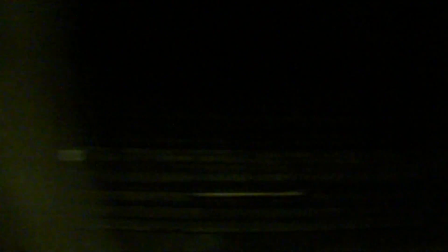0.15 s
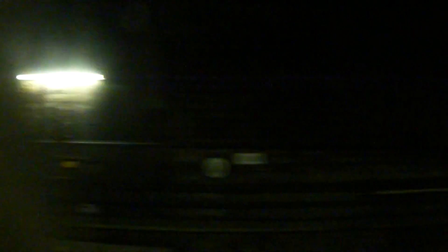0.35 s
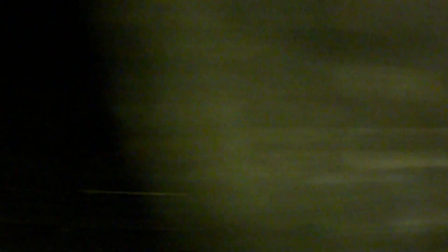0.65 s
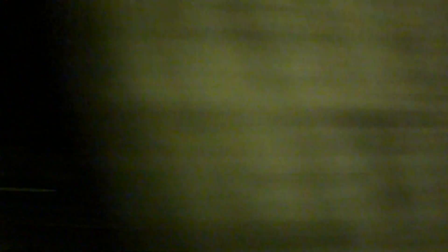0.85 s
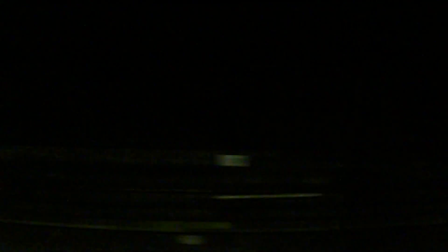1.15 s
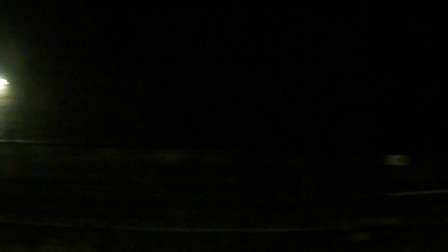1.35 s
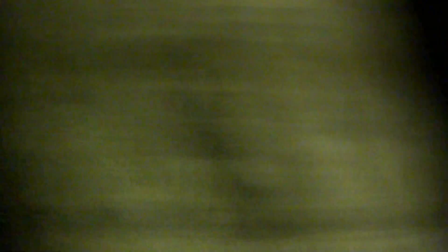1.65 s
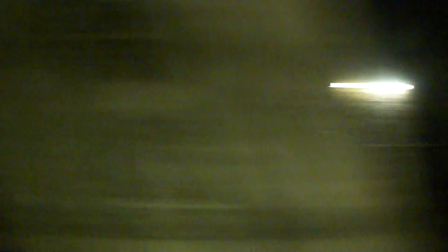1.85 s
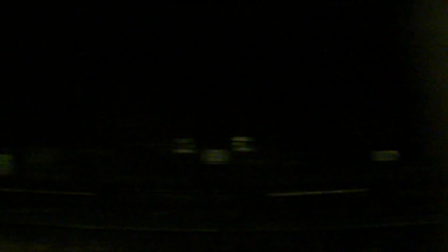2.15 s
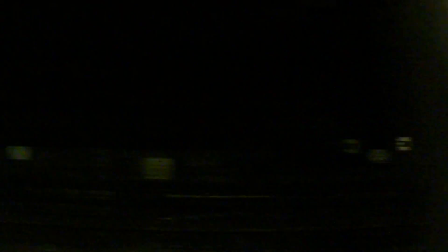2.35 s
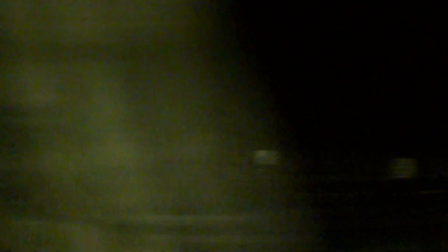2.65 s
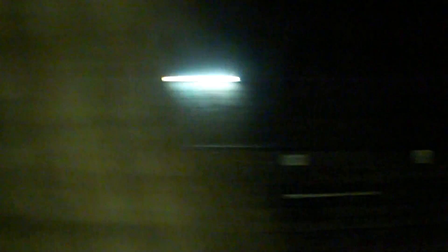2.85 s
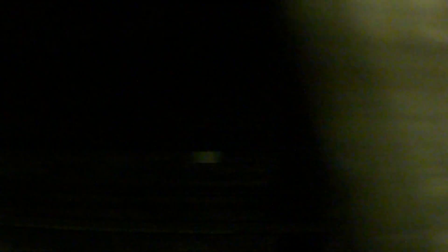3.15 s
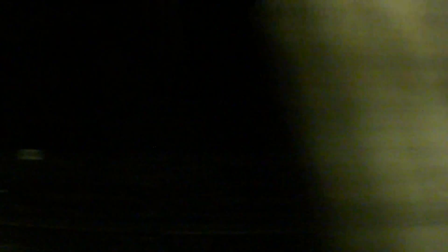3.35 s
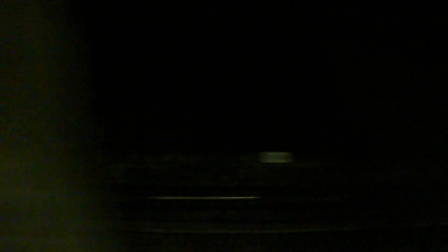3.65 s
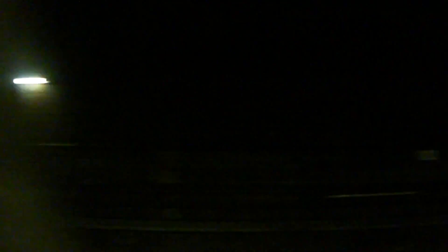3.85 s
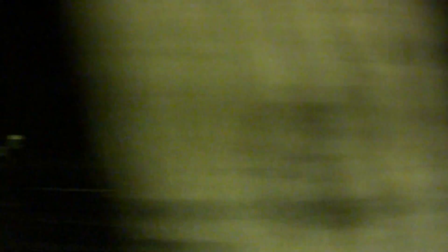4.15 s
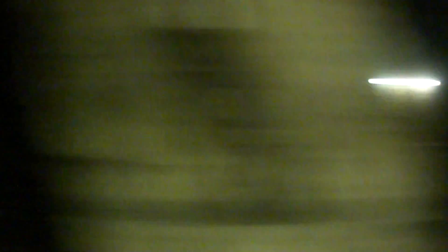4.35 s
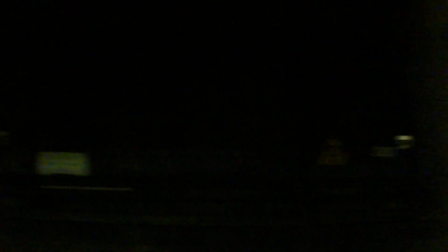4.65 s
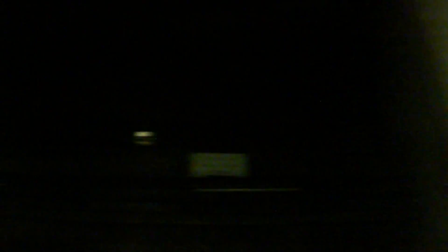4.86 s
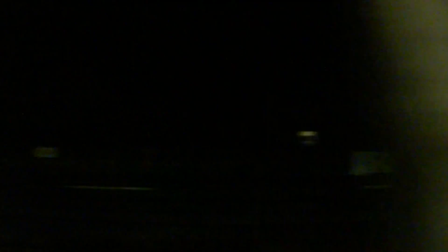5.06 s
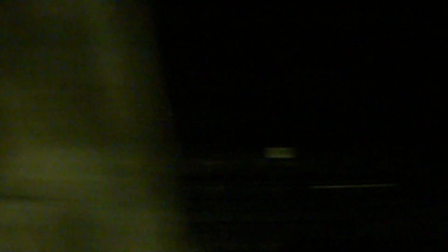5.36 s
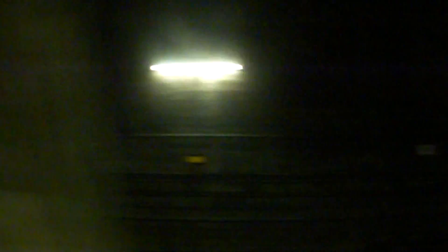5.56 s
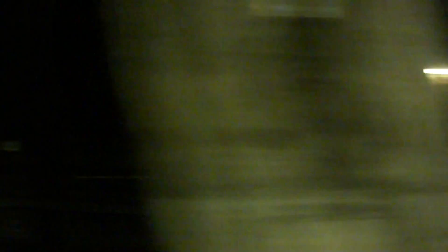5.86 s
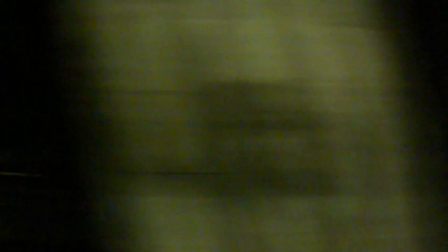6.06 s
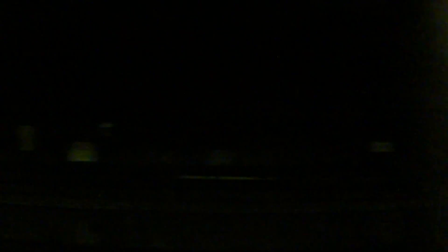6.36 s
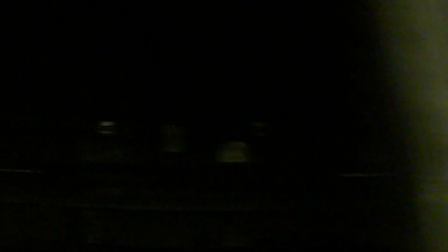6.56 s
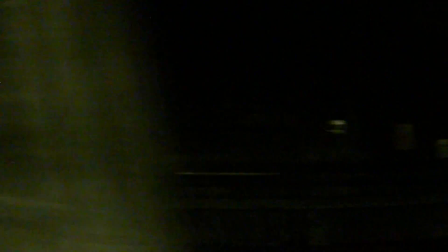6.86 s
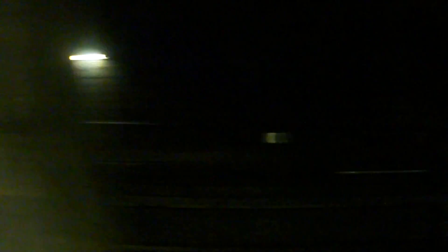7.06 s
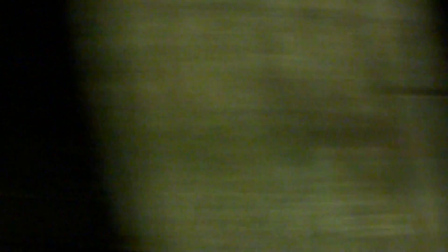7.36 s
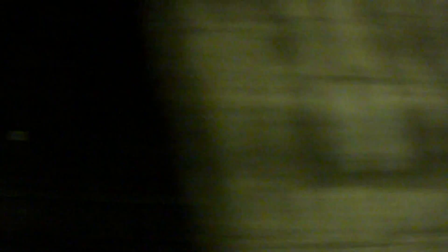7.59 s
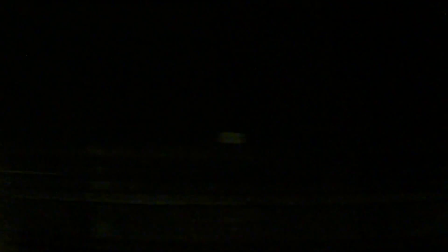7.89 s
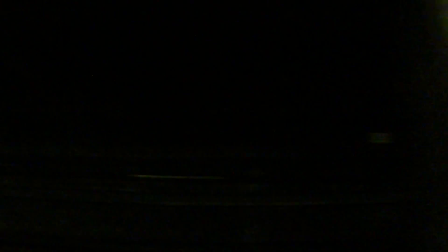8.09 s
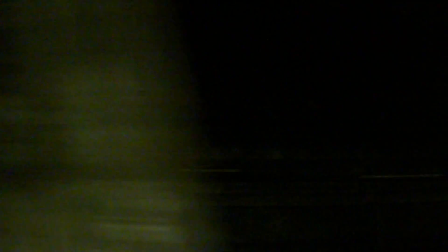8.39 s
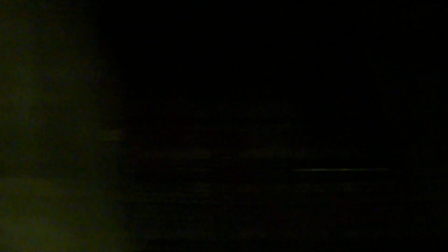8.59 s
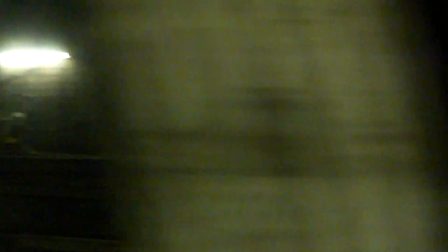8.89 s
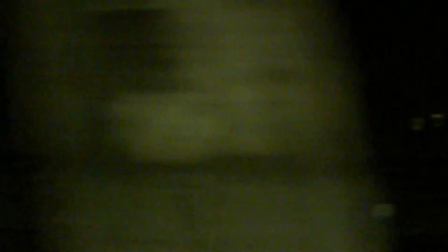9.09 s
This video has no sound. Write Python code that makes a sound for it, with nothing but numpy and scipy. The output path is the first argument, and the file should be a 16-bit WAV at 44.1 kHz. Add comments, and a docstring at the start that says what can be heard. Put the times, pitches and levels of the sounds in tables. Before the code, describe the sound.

Loud rolling rumble and a steady low drone fill a subway car moving through a tunnel, picked up from inside by a pocket camera. The floor and walls resonate, and the track noise swells in short surges. From about halfway the roar brightens, the rails sing faintly and a loose fitting ticks lightly now and then. A few soft knocks from rail joints come in the last second.

```python
"""A subway car running through a tunnel, heard from inside: the body hums, floor and panels boom.
Underfoot the wheels roar, brighter as the run goes on, and knock on rail joints; the rails sing.
Around the microphones air hisses at the door seals and a small loose fitting ticks.
The pocket camera's stereo pair thins the bass, dulls and notches the treble, rides the gain
and crackles faintly now and then."""
import sys
import numpy as np
from scipy import signal
from scipy.fft import rfft, irfft, next_fast_len
from scipy.io import wavfile
from scipy.ndimage import uniform_filter1d

SR = 44100
rng = np.random.default_rng(int(sys.argv[2]) if len(sys.argv) > 2 else 0)


def store_pcm(level_fs):
    """Save levels as 16-bit WAV."""
    pcm = np.round(np.clip(level_fs, -1, 1) * 32767).astype(np.int16)
    wavfile.write(sys.argv[1], SR, np.atleast_2d(pcm).T)


N = 407043
TIME = np.arange(N) / SR
SIZE = next_fast_len(N)
HZ = np.fft.rfftfreq(SIZE, 1 / SR)

# Resonances of the car: f/Hz, nominal width/Hz, level/dB
BODY_MODE = [(187, 39.6, 0)]  # first bending mode
FLOOR_MODES = [(304.8, 91, 3.5), (353.6, 60, 0)]
DRONE_MODES = [(75, 30, 3), (111, 40, -6)]
# Slow course of the low drone: t/s, level/dB
DRONE_LEVEL = [(0, -59.5), (1, -63), (2.5, -66), (3.5, -60), (5, -61), (6.5, -60), (7.1, -46), (8, -57),
               (8.8, -45), (9.23, -41)]
# Spectrum of the deep shudder: f/Hz, level/dB
SHUDDER_SPECTRUM = [(15, -80.5), (25, -55), (43, -52), (68, -40.5), (127, -8.5), (146, 4), (170, 5),
                    (220, -32.5), (370, -120)]
# Slow levels in the car: t/s, body hum/dB, floor boom/dB, rolling rumble/dB, shudder/dB
BODY_LEVELS = [(0, -22, -39, -22, -43), (0.401, -24, -33.5, -23.5, -58), (.9, -20, -31, -25, -56),
               (1.398, -19.5, -34.5, -23.5, -55), (1.899, -22.5, -31.5, -23, -47.5),
               (2.6, -20.5, -31, -21.5, -52.5), (3.3, -23, -31, -24, -43), (3.8, -24.5, -29, -20, -34),
               (4.4, -23.5, -28.5, -20.5, -42), (4.8, -24, -26, -21.5, -31),
               (5.599, -25, -21, -24.5, -36.5), (6.3, -27.5, -20.5, -22, -34.5),
               (7.0, -23, -24, -21.5, -35), (7.6, -25.5, -20, -22.5, -34), (8.3, -33, -19.5, -26.5, -34),
               (8.6, -24.5, -22, -26.5, -31), (8.9, -32.5, -28, -28.5, -32.5),
               (9.23, -27.5, -19.5, -36, -32)]


def car_body():
    """All around the microphones the body hums, booms and shudders, shaken by the running gear."""
    s, hum_db, boom_db, _, shudder_db = np.transpose(BODY_LEVELS)
    hum = steadied(noise(peaks(BODY_MODE, steep=3.25), s, 0 * s), share=.33)
    hum = hum * gain_of(np.interp(TIME, s, hum_db) + 0.2 * wander(per_s=10))
    hum = drifted(hum, shift_hz=1.78 * wander(per_s=2.5))
    low_cut = 1 / (1 + (155 / (HZ + 1)) ** 14)  # little of the hum reaches below about 155 Hz
    hum = filtered(hum, low_cut)
    boom = noise(peaks(FLOOR_MODES, steep=1.78), s, boom_db) * gain_of(0.47 * wander(per_s=3.7))
    drone = noise(peaks(DRONE_MODES, steep=1.7), *np.transpose(DRONE_LEVEL))
    shudder = noise(colour(SHUDDER_SPECTRUM), s, shudder_db) * gain_of(2.4 * wander(per_s=5))
    return hum + boom + drone + shudder


# Spectra of the rolling wheels, from inside the car: f/Hz, level/dB
RUMBLE_SPECTRUM = [(200, -56), (340, -1), (400, 2), (470, -3.5), (540, -4.5), (630, -7.5), (720, -11),
                   (816, -14), (1000, -26.5), (1300, -50.5), (2200, -120)]
DULL_ROAR = [(500, -24.5), (850, -2.5), (978, -1.5), (1140, 0.5), (1540, -3.5), (1890, -7), (2200, -9.5),
             (2700, -21), (2950, -26), (3840, -59), (6490, -120)]
BRIGHT_ROAR = [(500, -31.5), (850, -1), (1120, -9), (1200, -7), (1550, -5.5), (1830, -8.5), (2170, -8.5),
               (2660, -13), (2950, -18.5), (3840, -56), (6490, -120)]  # with the flanges rubbing
# Bright part of the roar's power: t/s, share/0-1
BRIGHTNESS = [(0, 0), (2, 0.18), (3.5, 0.26), (5, 0.65), (6.5, 0.92), (8, 0.89), (9.23, 0.7)]
# Wheel resonances: f/Hz, nominal width/Hz, level/dB
WHEEL_MODES = [(1560, 210, 2.5), (2145, 240, 2.5)]
# Slow levels of the track noise: t/s, wheel roar/dB, door hiss/dB
TRACK_LEVELS = [(0, -32.5, -61.5), (.3, -33.5, -61), (.8, -36, -63), (1.5, -35.5, -62.5),
                (1.95, -34.5, -61.5), (2.5, -36, -62), (3.3, -35, -61.5), (3.9, -33, -61),
                (4.3, -33.5, -62), (4.7, -31.5, -59.5), (5.2, -32.5, -59), (5.65, -32.5, -61),
                (6.0, -32.5, -57), (6.45, -32.5, -59.5), (6.9, -31, -56.5), (7.8, -29.5, -57),
                (8.3, -30, -56), (8.6, -28.5, -56), (9.0, -26.5, -53), (9.23, -34, -58)]
# The whole track noise surges: t/s, length/s, rumble gain/dB, roar gain/dB, nominal hiss gain/dB
SURGES = [(1.0, .05, 1, 0.5, 4), (1.01, .12, 1.5, 3.5, 3.5), (1.3, 0.15, 1.5, 1.5, 2.5),
          (2.0, 0.16, 1, 2, 2.5), (2.52, 0.14, 1, 2.5, 2), (2.86, 0.11, 1, 4, 2.5),
          (3.5, 0.11, -0.5, 0.5, 1.5), (3.63, 0.076, 1, 1, 2), (4.46, 0.036, 0.5, 2, 2.5),
          (4.73, 0.086, 0, -1.5, -1), (5.26, .06, 0.5, 1.5, 0), (6.02, 0.2, 1, 1, 1),
          (8.42, .08, 2.5, 2, 3.5), (8.55, 0.04, 2, 3, 3), (8.675, 0.066, 1, 2.5, 6),
          (8.76, 0.087, -0.5, 2.5, 9), (9.04, 0.026, 4, 5, 5), (9.12, 0.072, 0, 5, 8)]
# The flanges rub for a moment: t/s, length/s, wheel ring gain/dB, squeal gain/dB, singing gain/dB
FLANGE_RUBS = [(3.63, 0.041, 11, 3, 5), (4.35, .05, 6, 4, 6), (4.67, .13, 4, 2, 10),
               (5.26, 0.04, 12, -2, -1), (5.96, 0.11, 4, -3, 3.5), (6.7, 0.52, 3, -7, 3),
               (6.97, 0.026, 13, 0, -1), (7.19, .23, 3, 5, -1), (7.62, 0.12, 7, 6, 6), (7.9, .08, 2, 2, 6),
               (8.05, 0.45, -1, 6, 3), (8.56, 0.042, 13, -5, 5), (8.74, 0.11, 8.5, -6, 6),
               (9.04, 0.053, 12.5, -7, -5), (9.11, 0.14, 11.5, 0, 5.5)]


def wheels():
    """Rolling rumble and roar come back from the tunnel walls; the wheels ring on top."""
    s, _, _, rumble_db, _ = np.transpose(BODY_LEVELS)
    rumble = noise(colour(RUMBLE_SPECTRUM), s, rumble_db)
    rumble = rumble * gain_of(swell(SURGES, column=2) + 0.31 * wander(per_s=8.2))
    s, roar_db, _ = np.transpose(TRACK_LEVELS)
    dull = noise(colour(DULL_ROAR), s, roar_db)
    bright = noise(colour(BRIGHT_ROAR), s, roar_db)
    share = curve(BRIGHTNESS)
    roar = (np.sqrt(1 - share) * dull + np.sqrt(share) * bright) * gain_of(swell(SURGES, column=3))
    ring_db = follow_hiss(-46.5, slope=0.59) + swell(FLANGE_RUBS, column=2) + 3.7 * wander(per_s=7.6)
    rings = noise(peaks(WHEEL_MODES, steep=1.74), TIME, ring_db)
    return rumble + rings + roar * gain_of(0.5 * wander(per_s=20))


# Wall and roof panel resonances: f/Hz, nominal width/Hz
PANEL_MODES = [(214, 66.4), (435, 58), (500, 69), (582, 74), (672, 74), (760, 110)]
# Their slow levels: t/s, then level/dB for each mode in turn
PANEL_LEVELS = [(0, -23, -22, -41.5, -28, -35, -39), (0.599, -24.5, -24, -43, -36.5, -34.5, -40),
                (1, -27.5, -30.5, -41, -40.5, -37.5, -37.5), (1.4, -27.5, -28.5, -40, -40, -35, -39.5),
                (2, -24, -32.5, -40, -41, -40, -41), (2.7, -24.5, -28.5, -35.5, -33.5, -32.5, -41.5),
                (3.4, -25, -25.5, -37.5, -29.5, -35.5, -38.5), (4.1, -24, -27, -35.5, -34.5, -41, -44),
                (4.7, -26, -31, -31, -31, -39.5, -37), (5.3, -29, -23, -27.5, -31.5, -36, -40),
                (6.001, -28, -26, -31.5, -32.5, -39, -40), (6.7, -25.5, -28.5, -32, -28.5, -43, -40),
                (7.4, -29.5, -24, -33, -32.5, -35.5, -41.5), (8.1, -31, -23, -26, -28, -36, -41.5),
                (8.6, -27.5, -29, -28, -32.5, -35, -37.5), (8.9, -23.5, -27, -27.5, -31.5, -32.5, -31),
                (9.23, -33.5, -31.5, -23, -32, -32, -30)]
# All modes drift up or down together: t/s, shift/share of pitch
PANEL_DRIFT = [(0, 0.036), (1.4, 0.017), (2.5, -0.017), (3.2, -.03), (4.2, -0.0048), (6, 0.0092),
               (7.5, .025), (8.1, -0.008), (9.23, 0.0051)]


def panels():
    """Beside and above the microphones each panel mode rings and wavers; track surges shake them all."""
    s, *levels = np.transpose(PANEL_LEVELS)
    drift = curve(PANEL_DRIFT)
    out = np.zeros((2, N))
    for (hz, width), db in zip(PANEL_MODES, levels):
        ring = noise(peaks([(hz, width, 0)], steep=3.04), s, db)
        out += drifted(ring, shift_hz=hz * (drift + .015 * wander(per_s=1.5)))
    return out * gain_of(1.55 * swell(SURGES, column=2))


# Wheels cross rail joints: t/s, gain/dB, ring length/factor
RAIL_JOINTS = [(8.561, -8, 0.8), (9.02, -15, 0.84), (9.053, -10, 1.), (9.065, -25, 0.87), (9.084, -10, 1.)]
# Resonances of the running gear: f/Hz, level/dB, nominal t60/s
BOGIE_MODES = [(290, 4.5, 0.054), (345, -25, .05), (500, -7, 0.037), (584, -1, 0.05), (656, -1, 0.046),
               (800, -4, .04), (905, -11, .03), (1560, -19, .03), (2120, -5, .04)]


def joint_knocks():
    """Under the floor each joint rings the running gear with a soft blow."""
    out, t = np.zeros(N), np.arange(SR // 8) / SR
    attack = 1 - np.exp(-t / 0.0013)
    for s, db, stretch in RAIL_JOINTS:
        phases = rng.random(len(BOGIE_MODES))
        ring = sum(gain_of(mode_db - 60 * t / (t60 * stretch)) * np.sin(2 * np.pi * (hz * t + phase))
                   for (hz, mode_db, t60), phase in zip(BOGIE_MODES, phases))
        out[round(s * SR):][:len(t)] += gain_of(db) * ring * attack
    return out


# Rail resonances: f/Hz, nominal width/Hz, level/dB
SCRAPE_MODES = [(3470, 890, -4), (4560, 500, -5)]
SQUEAL_MODES = [(3250, 110, -4), (3450, 130, 0)]
SINGING_MODE = [(7040, 300, -5)]  # slid to SINGING_PITCH
HIGH_SINGING_MODE = [(9420, 220, 0)]
# The thin singing drifts: t/s, f/Hz
SINGING_PITCH = [(0, 6830), (4.8, 6920), (5.4, 7150), (5.8, 7050), (6.05, 6800), (6.9, 6830), (7.5, 6770),
                 (7.95, 6730), (8.15, 7200), (8.5, 6950), (8.8, 6670), (9.23, 6700)]


def rails():
    """Below the car the rails scrape and squeal; two thin bands sing as the flanges rub harder."""
    scrape = noise(peaks(SCRAPE_MODES, steep=1.1), TIME, follow_hiss(-70, slope=1.6))
    squeal_db = follow_hiss(-72, slope=1) + swell(FLANGE_RUBS, column=3) + 2.2 * wander(per_s=9)
    squeal = noise(peaks(SQUEAL_MODES, steep=0.69), TIME, squeal_db)
    singing_db = follow_hiss(-73.5, slope=1.5) + swell(FLANGE_RUBS, column=4) + 1.1 * wander(per_s=11)
    singing = noise(peaks(SINGING_MODE, steep=1.8), TIME, singing_db)
    singing = drifted(singing, shift_hz=curve(SINGING_PITCH) - SINGING_MODE[0][0])
    high_db = follow_hiss(-84, slope=1.1) + 1.2 * wander(per_s=9)
    high = noise(peaks(HIGH_SINGING_MODE, steep=1.6), TIME, high_db)
    rub = np.clip(.25 + curve(BRIGHTNESS), 0, 1)
    return patchy(scrape + squeal + rub * (singing + high), patch_db=1.5, gust_db=-0.4)


# Brief whistles from the rails: t/s, length/s, f/Hz, nominal width/Hz, level/dB
WHISTLES = [(4.75, .05, 9500, 200, -73), (4.97, .1, 9600, 200, -73), (5.68, .2, 5550, 300, -71),
            (6.46, .1, 9400, 200, -71), (7.22, .08, 3320, 280, -56), (7.72, .3, 5600, 350, -64),
            (8.19, .08, 5650, 280, -60), (8.41, .07, 9450, 240, -66), (8.59, .07, 9450, 240, -65),
            (8.77, .13, 6050, 450, -56), (8.67, .04, 3550, 300, -53), (8.74, .09, 3400, 240, -48),
            (9.12, .06, 3450, 300, -50)]
RISE_S, FALL_S = 0.024, 0.068  # of whistles, surges and rubs alike


def rail_whistles():
    """Each whistle is noise in one narrow resonance that rises, holds and falls."""
    out = np.zeros((2, N))
    for start, length, hz, width, db in WHISTLES:
        t = np.arange(0, min(length + FALL_S, TIME[-1] - start), 1 / SR)
        left, apart = rng.standard_normal((2, SR // 2))[:, :len(t)]
        right = 0.42 * left + 1.1 * apart
        mode = signal.iirpeak(hz, hz / width, SR)
        ring = signal.lfilter(*mode, signal.lfilter(*mode, [left, right]))
        envelope = np.interp(t, [0, RISE_S, length, length + FALL_S], [0, 1, 1, 0])
        at = round(start * SR)
        out[:, at:at + len(t)] += gain_of(db) * unit_rms(ring) * envelope
    return out


# Spectrum of the air at the doors: f/Hz, level/dB
DOOR_SPECTRUM = [(4000, -30), (5000, -1), (5700, -5), (6700, -1.5), (7400, -4), (8500, -9), (9400, -13),
                 (10000, -17), (11300, -29), (12000, -43.5), (15500, -63)]


def door_hiss():
    """Air rushes past the door seals."""
    air = noise(colour(DOOR_SPECTRUM), TIME, hiss_level(surge_share=0.9))
    return patchy(air, patch_db=1.0, gust_db=1.3)


# A loose fitting ticks: t/s, gain/dB, left minus right/dB
TICKS = [(4.4223, -38, -3), (4.9526, -29.5, -1), (5.9384, -35, 2), (6.0945, -52, 3), (8.7114, -58, -7),
         (9.13, -26, 1)]
# Its resonances: f/Hz, level/dB, t60/s
FITTING_MODES = [(6000, -4, .007), (6700, -5, 0.008), (7500, -10, .006), (8900, -6, 0.007),
                 (9300, -6, 0.0077), (10800, -29, .006)]


def loose_fitting():
    """Inside the car each tick rings the same small metal part."""
    out, t = np.zeros((2, N)), np.arange(2000) / SR
    ring = sum(gain_of(db - 60 * t / t60) * np.sin(2 * np.pi * hz * t) for hz, db, t60 in FITTING_MODES)
    ring *= 1 - np.exp(-t / .0008)  # the blow is slightly soft
    for s, db, pan_db in TICKS:
        at = round(s * SR)
        out[:, at:at + len(t)] += gain_of(db) * balance(pan_db) * ring
    return out


# Spectrum of the highest hiss: f/Hz, level/dB
TOP_HISS_SPECTRUM = [(11000, -31), (13600, -14.5), (14200, -6), (15500, -1.5)]
# Its slow rise: t/s, level/dB
TOP_HISS_LEVEL = [(0, -88), (3, -87.5), (5, -85.5), (8.4, -78.5), (9.23, -76)]


def top_hiss():
    """Far in the background a faint hiss grows at the very top of the treble."""
    return noise(colour(TOP_HISS_SPECTRUM), *np.transpose(TOP_HISS_LEVEL))


# The camera crackles: t/s, gain/dB, length/s, jumps in the opening stutter/count, their spacing/s,
# their size/share of the first, low-pass f/Hz
CRACKLES = [(.3012, -23, .001, 1, 0, 0, 10000), (2.7022, -27, .001, 2, .00007, .6, 16000),
            (2.7072, -29.5, .018, 5, .00019, .8, 15000), (2.7130, -31, .009, 3, .00019, .8, 15000),
            (4.1385, -27, .001, 3, .000062, 1, 12500), (8.5462, -23.5, .012, 3, .00019, .7, 12000),
            (8.5515, -31, .001, 3, .00019, .4, 10000), (8.7116, -20, .001, 1, 0, 0, 4500)]


def camera_crackle():
    """Small jumps that relax at once, alike in both channels: a stutter, then one about every 3 ms."""
    out, index = np.zeros(N), np.arange(16)
    later, relax_s = index > 0, .0001
    for s, db, length, count, gap, share, dull_hz in CRACKLES:
        jitter, drop, sign = rng.random((3, 16))
        delay_s = (index + jitter * later) * 0.0028
        jumps = gain_of(db - 10 * drop * later - 150 * delay_s) * np.sign(sign - .5) * (delay_s <= length)
        sizes = np.append(jumps, np.full(count - 1, jumps[0] * share))
        positions = np.append(delay_s, gap * np.arange(1, count)) * SR
        burst = sizes @ np.sinc(np.arange(-100, 1900) - positions[:, None])  # impulses between samples
        out[round(s * SR) - 100:][:2000] += signal.lfilter(*signal.butter(2, dull_hz, fs=SR), burst)
    return signal.lfilter([1], [1, -np.exp(-1 / (relax_s * SR))], out)


# Stereo width at the microphones: f/Hz, side minus mid/dB
STEREO_WIDTH = [(60, -29.5), (140, -34), (210, -36.5), (320, -22), (490, -22.5), (740, -15.5), (1130, -11),
                (1710, -9.5), (2600, -9.5), (4500, -4.5), (8000, -3.5), (12000, 3)]


def noise(shape, s, level_db):
    """Stereo noise of a given colour, nearly mono in the bass, on a level curve."""
    draws = rng.standard_normal((2, len(HZ), 2), dtype=np.float32)
    mid, side = draws.view(np.complex64)[:, :, 0] * shape
    side = side * colour(STEREO_WIDTH)
    pair = irfft([mid + side, mid - side], SIZE)[:, :N]
    return pair * gain_of(np.interp(TIME, s, level_db)) / np.std(pair.mean(0))


def peaks(modes, steep):
    """Gain of a set of resonances; steep over 1 narrows them, and far above them nothing is left."""
    power = sum(gain_of(db) ** 2 / (1 + (2 * (HZ - hz) / width) ** 2) ** steep for hz, width, db in modes)
    return np.sqrt(power) / (1 + (HZ / (2 * modes[-1][0])) ** 6)


def patchy(x, patch_db, gust_db):
    """Rough rails make random patches in time and pitch; gusts flicker over the whole treble."""
    hz, t, spectra = signal.stft(x, SR, nperseg=512, noverlap=384)
    patches = rng.standard_normal((len(t), len(hz))).T
    patches = unit_rms(uniform_filter1d(uniform_filter1d(patches, size=6, axis=0), size=24, axis=1))
    gusts = unit_rms(uniform_filter1d(rng.standard_normal(len(t)), size=16))
    flicker = gain_of(patch_db * patches + gust_db * gusts)
    return signal.istft(spectra * flicker, SR, nperseg=512, noverlap=384)[1][:, :N]


def steadied(x, share):
    """A steadily driven vibration swells less than free noise: part of its envelope is divided out."""
    envelope = abs(signal.hilbert(x.mean(0), SIZE)[:N])
    return unit_rms(x / (envelope + 0.67 * np.std(x)) ** share)


def drifted(x, shift_hz):
    """Slides a narrow band up or down along a curve."""
    return (signal.hilbert(x, SIZE)[:, :N] * np.exp(2j * np.pi * np.cumsum(shift_hz) / SR)).real


def swell(events, column):
    """Gain in dB from one column of events: each rises, holds and falls back."""
    coarse = TIME[::50]
    out = np.zeros(len(coarse))
    for row in events:
        start, end = row[0], row[0] + max(row[1], RISE_S)
        out += row[column] * np.interp(coarse, [start, start + RISE_S, end + 1e-4, end + FALL_S],
                                       [0, 1, 1, 0])
    return np.interp(TIME, coarse, out)


def wander(per_s):
    """Slow random motion of spread 1, up to per_s swings a second."""
    hz, phase = np.geomspace(per_s / 8, per_s, 24)[:, None], rng.random((24, 1))
    coarse = TIME[::200]
    swings = np.sin(2 * np.pi * (hz * coarse + phase)) / np.sqrt(hz)
    return np.interp(TIME, coarse, unit_rms(swings.sum(0)))


def hiss_level(surge_share):
    """Slow level of the door hiss with a share of its surges, in dB."""
    s, _, hiss_db = np.transpose(TRACK_LEVELS)
    return np.interp(TIME, s, hiss_db) + surge_share * swell(SURGES, column=4)


def follow_hiss(base_db, slope, quiet_hiss_db=-62):
    """Level of a wheel or rail mode: base_db at the quiet hiss, plus slope dB per dB of hiss above it."""
    return base_db + slope * (hiss_level(surge_share=0.25) - quiet_hiss_db)


def curve(points):
    return np.interp(TIME, *np.transpose(points))


def over_frequency(points):
    hz, db = np.transpose(points)
    return np.interp(np.log(HZ + 1), np.log(hz + 1), db)


def colour(points):
    return gain_of(over_frequency(points))


def filtered(x, response):
    return irfft(rfft(x, SIZE) * response, SIZE)[:, :N]


def balance(left_minus_right_db):
    return gain_of(left_minus_right_db * np.array([[.5], [-.5]]))


def gain_of(db):
    return 10 ** (np.asarray(db) / 20)


def unit_rms(x):
    return x / np.sqrt(np.mean(x ** 2) + 1e-20)


def excess_db(x, threshold_db, window):
    """How far the level stands above a threshold, smoothed over a window of samples."""
    power_db = 10 * np.log10(abs(uniform_filter1d((x ** 2).mean(0), window)) + 1e-12)
    return uniform_filter1d(np.maximum(power_db - threshold_db, 0), window)


def scene():
    """Everything that reaches the microphones inside the car."""
    background = top_hiss()
    return (car_body() + panels() + joint_knocks() + wheels() + rails() + rail_whistles()
            + door_hiss() + loose_fitting() + background)


# Dips of the camera's filter: f/Hz, width/Hz, depth/dB
CAMERA_NOTCHES = [(2997, 347, -23), (3980, 340, -28), (5026, 570, -29)]
# Its two microphones differ a little: f/Hz, left minus right/dB
MIC_BALANCE = [(100, -.1), (250, -.5), (500, -.1), (1000, .4), (2000, -.8), (4000, .2), (8000, .7)]
BASS_CUT_HZ, TREBLE_EDGE_HZ = 92.4, 15750


def record(dry):
    """The pocket camera: filter dips, gain control that shaves swells, crackle, bass cut, band limit."""
    dips = np.prod([1 - (1 - gain_of(db)) / (1 + (2 * (HZ - hz) / width) ** 2)
                    for hz, width, db in CAMERA_NOTCHES], 0)
    heard = filtered(dry, dips * balance(over_frequency(MIC_BALANCE)))
    slow_db = -0.04 - 0.075 * excess_db(heard, threshold_db=-22, window=900)
    quick_db = -.5 * excess_db(heard, threshold_db=-13, window=300)  # catches the peaks
    ridden = heard * gain_of(slow_db + quick_db)
    bass_cut = gain_of(-22.5) + 1 / (1 + (BASS_CUT_HZ / (HZ + 1)) ** 6)
    thinned = filtered(ridden + camera_crackle(), bass_cut)
    low_pass = signal.firwin(511, TREBLE_EDGE_HZ, window=("kaiser", 9), fs=SR)
    return signal.oaconvolve(thinned, low_pass[None], "same")


dry = scene()
out = record(dry)
store_pcm(out)
```